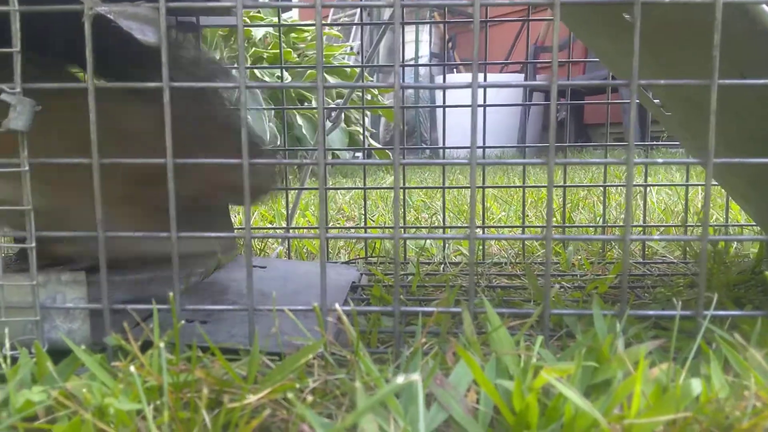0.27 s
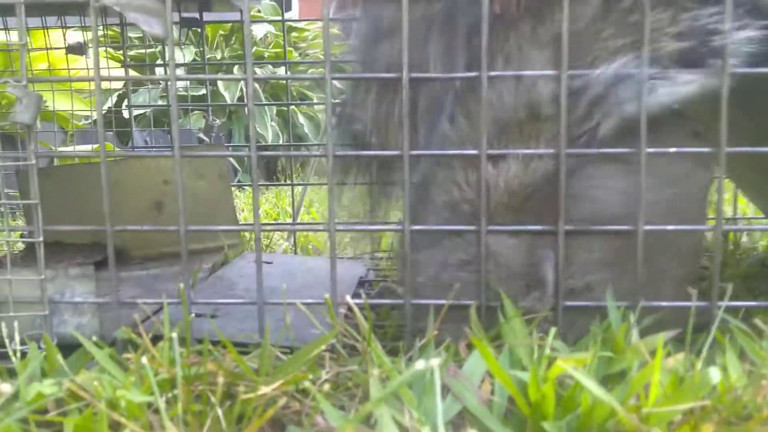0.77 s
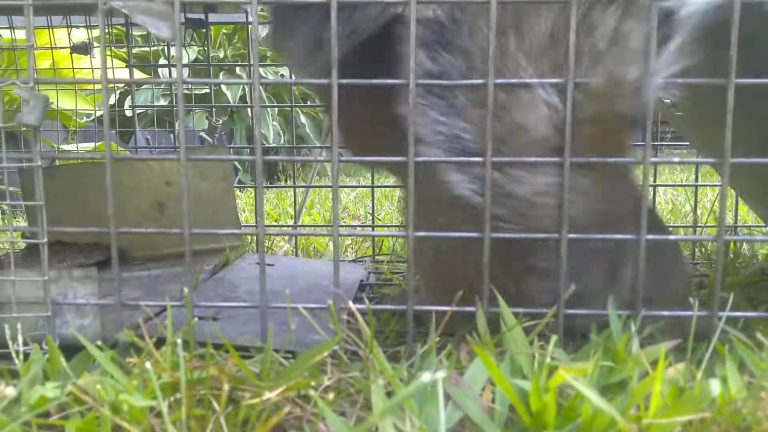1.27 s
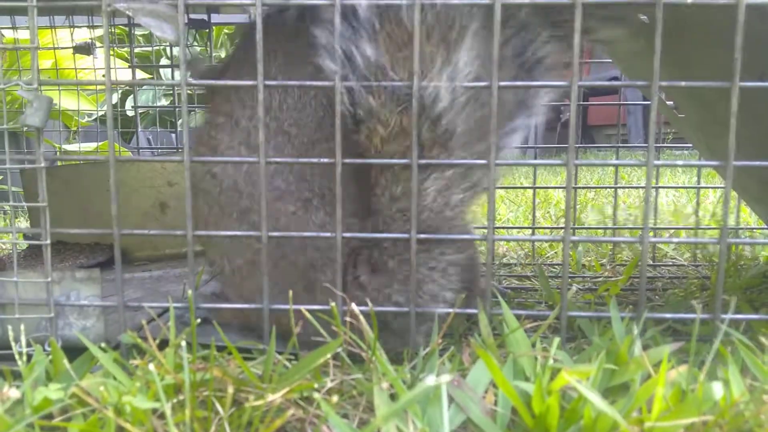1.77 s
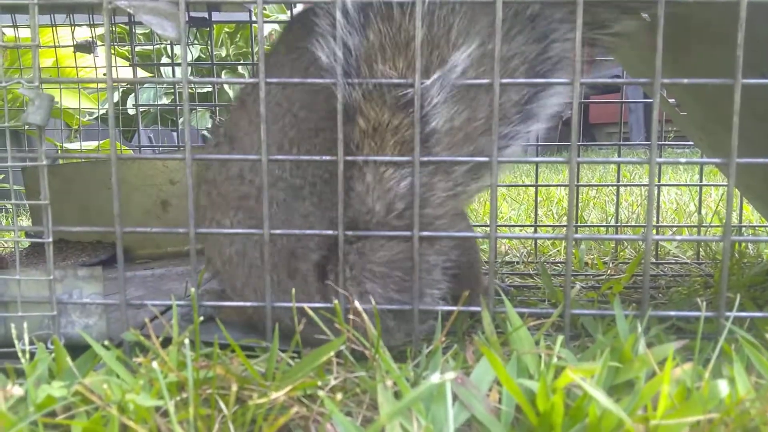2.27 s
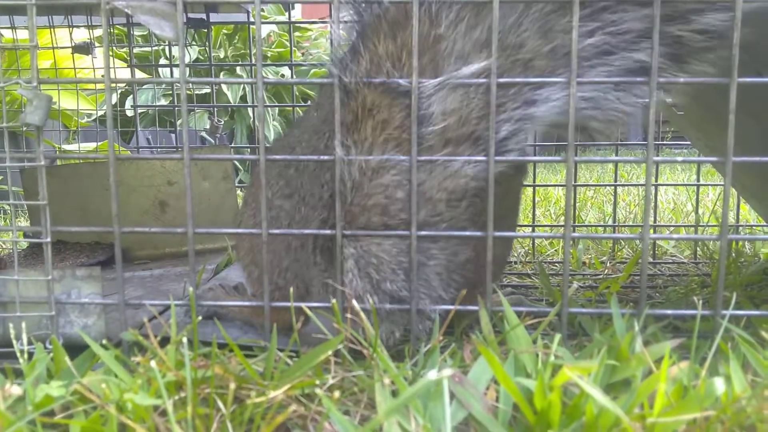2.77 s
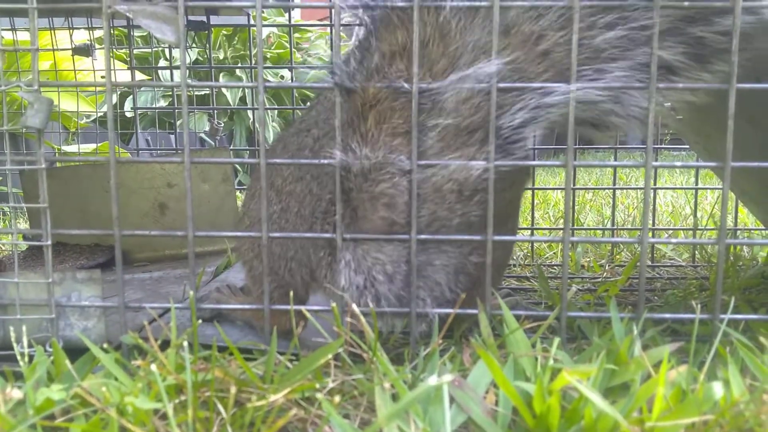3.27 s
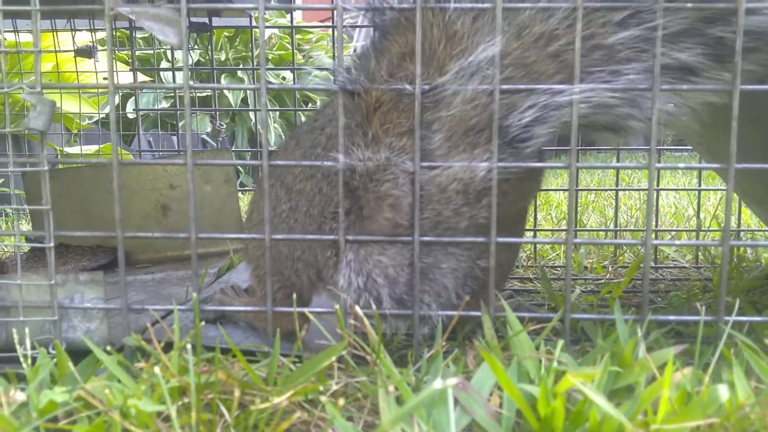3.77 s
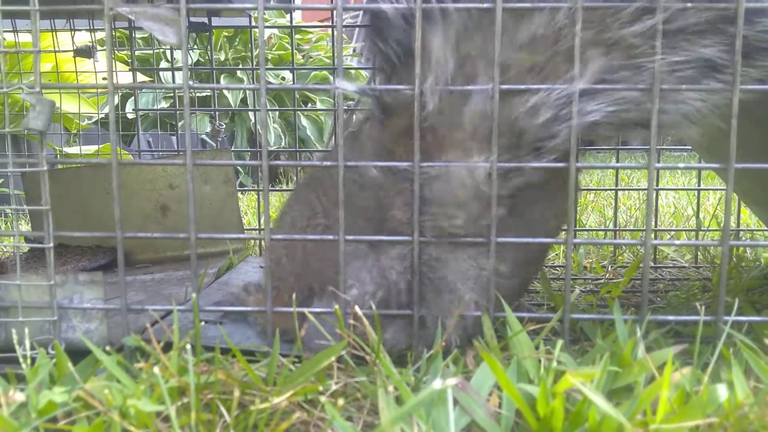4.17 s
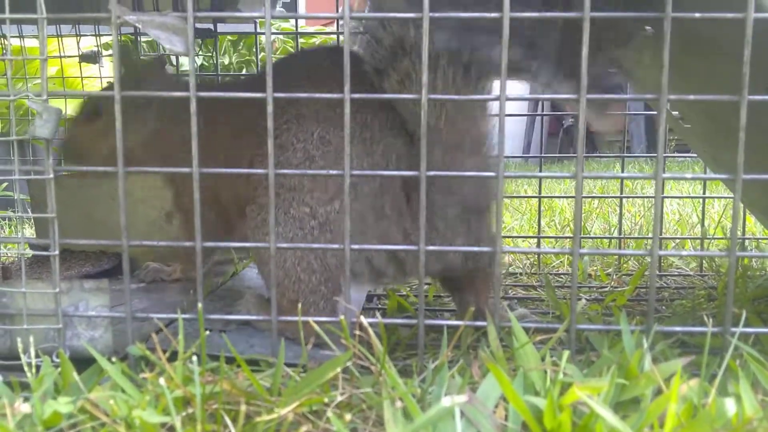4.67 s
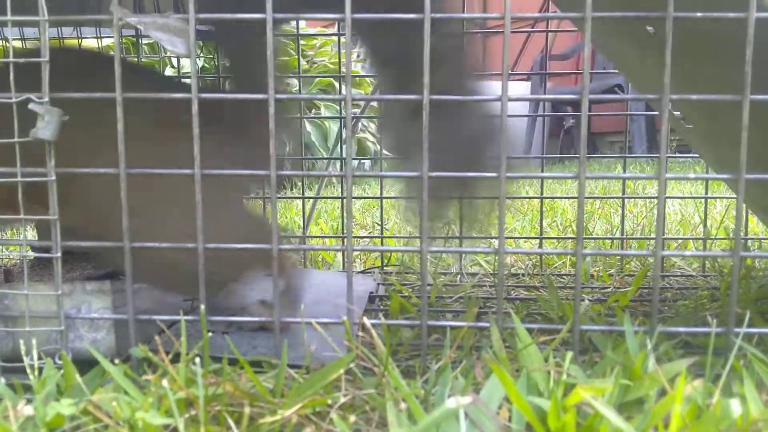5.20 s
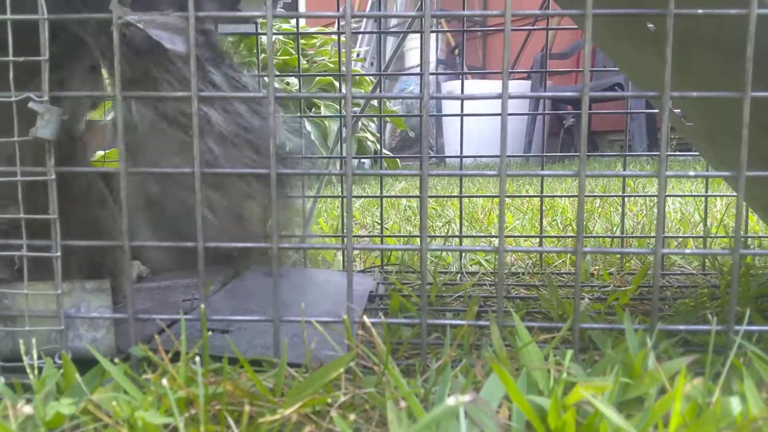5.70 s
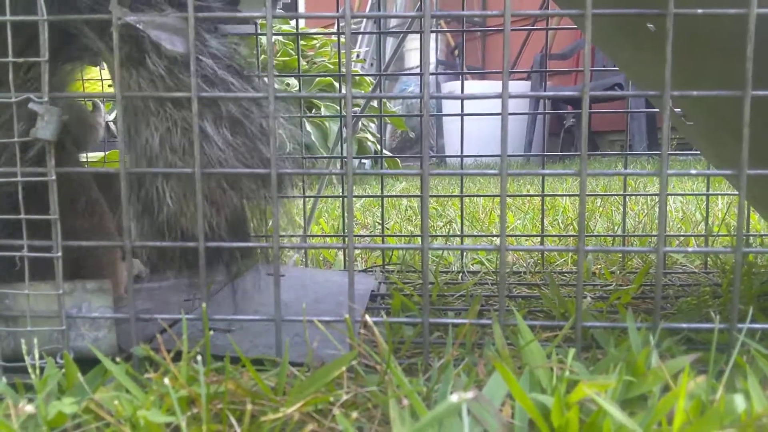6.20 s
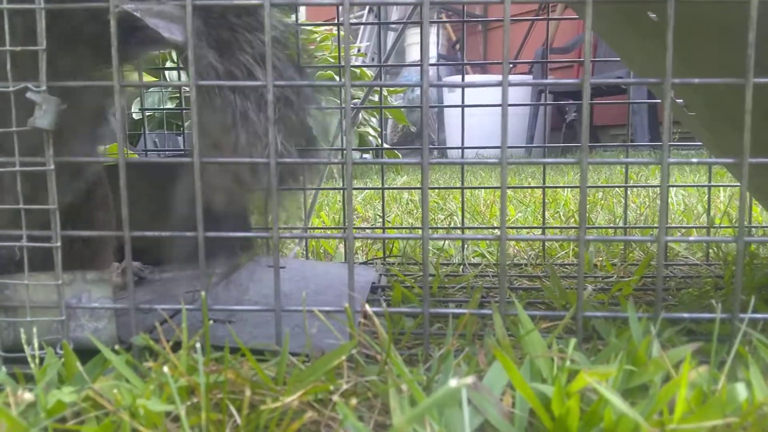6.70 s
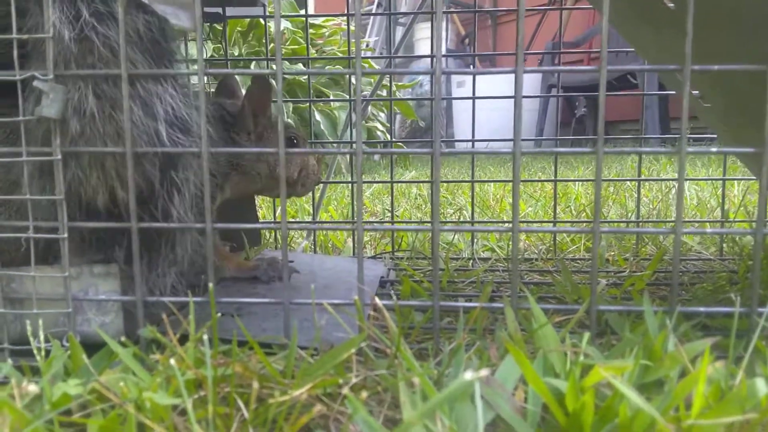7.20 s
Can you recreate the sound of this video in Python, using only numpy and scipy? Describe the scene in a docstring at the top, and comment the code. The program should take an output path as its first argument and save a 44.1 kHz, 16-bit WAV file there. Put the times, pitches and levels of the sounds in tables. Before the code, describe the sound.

A squirrel-sized rodent in a wire cage gives fifteen hoarse, raspy squeals that climb to shrill, amid scuffs and claw knocks on a lawn.

```python
"""Squealing rodent in a wire trap

A squirrel-sized rodent on a lawn gives fifteen hoarse calls: harmonic notes, rasping breath and hiss.
Throat and teeth resonances shape the calls, and sparse echoes give them a short tail.
Bursts of noise and single knocks ring mesh and tread plate as scuffs, drumming and claws.
A far rumble and a soft rustle of shaped noise lie below; two ports hear phase and level differences."""
import sys
import numpy as np
from scipy import signal
from scipy.fft import rfft, irfft
from scipy.io import wavfile
from scipy.ndimage import uniform_filter1d

SR = 44100
rng = np.random.default_rng(int(sys.argv[2]) if len(sys.argv) > 2 else 0)


def file_out(sig):
    """Save sig as 16-bit WAV at sys.argv[1]."""
    # one column per channel
    cols = np.atleast_2d(sig).T
    # limit, then scale
    lim = np.clip(cols, -1, 1)
    pcm = np.round(lim * 32767).astype(np.int16)
    wavfile.write(sys.argv[1], SR, pcm)


N = 328545

# calls, levels sliding evenly from start to end: (start [s], length [s], rasp start level [dB],
# rasp end level [dB], hiss start level [dB], hiss end level [dB])
CALLS = [(1.114, 0.19, -26.5, -41.5, -52.5, -62), (1.38, 0.27, -22.5, -37, -45.5, -53.5),
         (1.763, 0.1, -22, -18.5, -41.5, -28.5), (1.938, 0.13, -18.5, -27, -42, -46),
         (2.25, 0.12, -25.5, -35, -61, -42), (2.586, 0.14, -19.5, -33, -47, -51.5),
         (2.915, 0.15, -45.5, -38, -27.5, -60), (3.227, 0.14, -17, -45.5, -35, -52),
         (3.638, 0.16, -41, -37, -43, -38), (3.954, 0.28, -27.5, -51.5, -42, -67),
         (4.391, 0.29, -35.5, -41.5, -38, -65), (4.854, 0.35, -41, -49.5, -42, -63.5),
         (5.335, 0.37, -57, -37, -53, -50.5), (5.813, 0.2974, -46, -38.5, -50, -51),
         (6.205, 0.24, -38.5, -26.5, -58, -60.5)]
# bell-shaped chest pushes: (centre [s], half width at 1/e of the lift [s], rasp lift [dB], hiss lift [dB])
PUSHES = [(1.144, 0.038, 10, 10.5), (1.568, 0.053, 14.5, 9), (1.815, 0.07, 2, -1.5),
          (2.263, 0.022, 13.5, 18.5), (2.671, 0.06, 6.5, 7), (2.92, 0.021, 19.5, -13),
          (3.765, 0.039, 14, -5.5), (4.181, 0.075, 22, 16), (4.45, 0.064, 14.5, -0.5),
          (4.641, 0.065, 13.5, 9), (4.899, 0.058, 17.5, -2.5), (5.123, 0.028, 24.5, 8.5),
          (5.448, 0.088, 10, 9.5), (5.601, 0.23, 19, -2), (5.85, 0.026, 17, 5), (6.049, 0.1, 21, 3.5),
          (6.268, 0.028, 13, 16), (6.345, 0.046, 10, 8.5)]
# voiced notes, pitch before waver: (start [s], length [s], start pitch [Hz], middle pitch [Hz],
# end pitch [Hz], start level [dB], change of level [dB])
NOTES = [(1.118, 0.14, 676.6, 703, 737, -16.5, -5.5), (1.512, 0.1, 470.4, 795, 921, -28.5, 10.5),
         (1.764, 0.071, 447, 537, 459.2, -28.5, 8), (1.949, 0.094, 388.3, 602.5, 354.7, -20, -3),
         (2.281, 0.073, 720, 745, 420, -16.5, -17.5), (2.622, 0.054, 870.5, 610, 399, -22, -4.5),
         (2.689, 0.017, 2634, 2859, 3400, -17.5, -14.5), (2.916, 0.049, 1471, 1325, 1275, -31, 7.5),
         (2.949, 0.034, 1577, 1675, 1392, -25.5, 3.5), (2.987, 0.025, 1483, 1372, 1461, -22, -21.5),
         (3.232, 0.037, 831, 759, 685, -20, -11.5), (3.269, 0.068, 1417, 1612, 1438, -19, -15),
         (3.652, 0.023, 1635, 1398, 1359, -27.5, -1.5), (3.674, 0.09, 1682, 1549, 1333, -21, -0.5),
         (3.956, 0.018, 1291, 1203, 1143, -28.5, -4), (3.975, 0.046, 1160, 1495, 1739, -34.5, -5),
         (4.087, 0.096, 2997, 2882, 2784, -24.5, 4), (4.167, 0.041, 2810, 2313, 1316, -17.5, -4),
         (4.406, 0.077, 3912, 2587, 1700, -16.5, -4), (4.478, 0.046, 2980, 2777, 2735, -17.5, -6),
         (4.563, 0.04, 3365, 3307, 2700, -26, 8.5), (4.606, 0.049, 2670, 2500, 1396, -19.5, -4.5),
         (4.851, 0.03, 4630, 4340, 4820, -14.5, 7.5), (4.877, 0.011, 2508, 2750, 3160, -19, 0),
         (4.889, 0.068, 3240, 3020, 2643, -16.5, -5.5), (4.95, 0.055, 4723, 4555, 3790, -7, -5.5),
         (5.016, 0.085, 4370, 3970, 3630, -15.5, 3), (5.096, .042, 3190, 2890, 2700, -11.5, -11.5),
         (5.358, 0.029, 5850, 5846, 5750, -5.5, 4.5), (5.384, 0.058, 5300, 4400, 3385, -12, -10),
         (5.441, 0.042, 3280, 3062, 2991, -21.5, 9.5), (5.486, 0.033, 2608, 2580, 2546, -18, 0.5),
         (5.522, 0.03, 4680, 4480, 4140, -13, -12), (5.548, 0.07, 2955, 2911, 2613, -24.5, 7.5),
         (5.617, 0.094, 2632, 2553, 1778, -19.5, -7), (5.808, 0.029, 1291, 1123, 999, -28, 0),
         (5.851, .083, 1638, 2070, 2127, -22.5, -1.5), (5.939, 0.031, 2130, 2260, 2355, -22.5, 4),
         (5.961, 0.082, 2878, 2658, 2554, -23.5, 8), (6.21, 0.04, 1323, 815, 707, -22, -11.5),
         (6.247, 0.077, 1546, 1753, 2168, -29.5, 8.5), (6.333, 0.066, 2660, 2525, 2613, -15.5, -9)]
# throat resonances: (centre [Hz], width of one pass [Hz], gain [dB])
THROAT = [(725, 2000, -20.5), (2680, 626, 2), (3214, 144, -7), (4400, 780, -25.5), (5750, 910, -33)]
# main throat bands of the first calls: (centre [Hz], width of one pass [Hz], gain [dB])
TIGHT_THROAT = [(2540, 460, 4), (2950, 310, -16)]
# resonances at the teeth: (centre [Hz], width of one pass [Hz], gain [dB])
TEETH = [(4204, 1000, -7), (5980, 750, -9), (7435, 1000, 3), (9748, 1330, 5.5), (13000, 430, -11.5)]
# mouth opening, lifting the breath in the two lowest teeth bands: (time [s], lift [dB])
GAPE = [(3.8, 4), (4.3, 18), (5.9, 16), (6.2, 8)]
# feet and tail, levels driving the resonances: (time [s], mesh scratch [dB], plate and ground thud [dB],
# 60 dB decay [s])
SCUFFS = [(0.1972, -54.5, -50.5, 0.42), (0.2943, -35.5, -46.5, 0.12), (0.3502, -41.5, -43, 0.21),
          (0.385, -32.5, -64, 0.042), (0.428, -47, -49, 0.092), (0.448, -30.5, -34, 0.19),
          (0.557, -40, -63, 0.18), (0.587, -42, -40.5, 0.25), (0.7006, -35.5, -35.5, 0.24),
          (0.752, -34.5, -44, 0.13), (0.9739, -49.5, -34.5, 0.11), (1.285, -31, -38, 0.19),
          (1.6917, -37, -41.5, 0.13), (2.413, -52, -51.5, 0.17), (4.2849, -44, -49, 0.1),
          (4.374, -46, -35.5, 0.076), (5.285, -33, -40.5, 0.083), (5.3081, -36, -37.5, 0.15),
          (6.432, -45, -51.5, 0.13), (6.862, -42.5, -62, 0.076), (6.984, -41, -48, 0.2),
          (7.072, -34, -37.5, 0.18)]
# quick drumming on the plate: (time [s], drive level [dB])
DRUMS = [(3.499, -49), (3.552, -44), (3.599, -40.5), (3.641, -36), (3.689, -36.5), (3.748, -37.5),
         (3.801, -37.5)]
# claws knocking the plate: (time [s], drive level [dB])
KNOCKS = [(.889, -29), (0.988, -25), (2.154, -35)]
# wire mesh resonances: (centre [Hz], width of one pass [Hz], gain [dB])
MESH = [(2890, 2700, -9.5), (3880, 480, 16), (7850, 2800, 7.5), (9840, 6300, 6.5), (13400, 4000, -4)]
# tread plate resonances: (centre [Hz], width of one pass [Hz], gain [dB])
PLATE = [(278, 170, -3), (524, 110, -2), (844, 260, -3), (1245, 430, -10), (2700, 1200, -13)]
# background: (time [s], far rumble level [dB], grass and fur rustle level before flicker [dB])
BED = [(0, -55, -59.5), (.75, -47, -53), (.9, -50.5, -63.5), (2, -56.5, -66), (3.3, -58, -69),
       (4.3, -55, -69), (5.3, -57, -65), (6.6, -54.5, -63.5), (7.45, -50, -63)]
# rumble colour: (frequency [Hz], relative level per Hz [dB])
RUMBLE = [(55, -4), (110, 2), (230, -0.5), (500, -11.5), (1100, -19.5), (2000, -43), (3000, -50)]
# rustle colour: (frequency [Hz], relative level per Hz [dB])
RUSTLE = [(300, -9.5), (3000, 3.5), (8000, -5), (13900, -10.5), (14500, -31)]
# call at the two ports, before smoothing: (frequency [Hz], left lead [rad], left minus right [dB])
CALL_PORTS = [(400, 0.03, -2), (1673, 0.7, 1.5), (2247, 3.92, 6), (2690, 5.56, -5), (3526, 4.67, 6),
              (3780, 4.9, -13.5), (4290, 2.6, 10), (5130, 9.1, -6.5), (5845, 4.14, 1.5), (6400, 3.55, 1),
              (8700, 5.46, 1.5), (11900, 4.5, -2)]
# cage and lawn at the ports: (frequency [Hz], left lead [rad], left minus right [dB], likeness [0-1])
LAWN_PORTS = [(60, 0, 2.5, .4), (300, 0, 2.5, .65), (700, 0, 1.5, .97), (1500, 0, -1, .95),
              (1950, 2.9, 0, .98), (2250, 3.4, 1, .98), (3200, 6.3, 1, .8), (6450, 15.7, 3, .85),
              (14000, 37, 6, .4)]

OPENS_S, OPENING_S = 1.25, 0.41  # when the throat starts to open, and how long it takes
ATTACK_S, RELEASE_S = 0.0019, 0.043  # breath of each call
NOTE_SWELL_DB = 5.5  # mid-note lift
STEEP = 3  # order of the main throat bands and the teeth
WHISTLE_HZ = 2450  # notes starting here or higher keep a faint octave
BODY_DB, VOICE_BODY_DB = -8, 0  # rasp and voice into the lowest throat band
BODY_PER_GAPE = -.3  # dB in that band per dB of gape: it fades as the mouth widens
EDGE_HZ = 14250  # upper band limit
HZ = np.fft.rfftfreq(N, 1 / SR)


def folds():
    """Vocal folds give harmonics on a wavering pitch; slack, low folds beat unevenly and leak air."""
    hz, level, octave = np.zeros((3, N))
    for start, length, start_hz, mid_hz, end_hz, db, change_db in NOTES:
        span, u = progress(start, length)
        arch = 4 * u * (1 - u)
        bend_hz = mid_hz - (start_hz + end_hz) / 2
        hz[span] = start_hz + (end_hz - start_hz) * u + bend_hz * arch
        if start_hz < WHISTLE_HZ:
            # the octave grows as the folds tighten, then gives way
            octave[span] = (hz[span] / 850) ** 1.61 / (1 + (hz[span] / 2600) ** 16)
        else:
            octave[span] = .35
        level[span] = amp(db + change_db * u + NOTE_SWELL_DB * arch)
    level = np.minimum(level, uniform_filter1d(level, size=200))  # softens the note edges
    slack = 1 / (1 + (hz / 1100) ** 4)
    waver_hz = 6 + .014 * hz + .025 * np.maximum(hz - 3300, 0) + .011 * hz * slack
    turns = np.cumsum(hz + waver_hz * wander(150, N)) / SR
    shimmer = amp(2.2 * wander(90, N))
    overtones = sum(np.cos(2 * np.pi * k * turns) / (1 + (k * hz / 3400) ** 4) for k in range(3, 9))
    leak = 1.8 * rng.standard_normal(N) * slack
    stack = np.cos(2 * np.pi * turns) + octave * np.cos(4 * np.pi * turns) + 0.72 * overtones
    growl = 1 + .6 * np.cos(np.pi * turns) / (1 + (hz / 640) ** 8)  # slack folds beat strong-weak
    # the sharp closing of the folds, kept inside the band
    edge = sum(np.cos(2 * np.pi * k * turns) * (k * hz < EDGE_HZ) for k in range(2, 6))
    voice = level * shimmer * (stack * growl + leak)
    return voice, amp(-46.0) * level * shimmer * edge


def breath(edge):
    """Air through the tight throat rasps in uneven puffs and hisses at teeth that ring with the edge."""
    t, gate, db = np.arange(N) / SR, np.zeros(N), np.zeros((2, N))
    for start, length, rasp_db, rasp_end_db, hiss_db, hiss_end_db in CALLS:
        span, u = progress(start, length)
        gate[span] = np.minimum(1, u * length / ATTACK_S) * np.minimum(1, (1 - u) * length / RELEASE_S)
        db[:, span] = np.outer([rasp_db, hiss_db], 1 - u) + np.outer([rasp_end_db, hiss_end_db], u)
    for s, width, *lift_db in PUSHES:
        span, u = progress(s - 3 * width, 6 * width)
        db[:, span] += np.outer(lift_db, np.exp(-(6 * u - 3) ** 2))
    puffs = amp(2.5 * wander(220, 3, N))
    air = evened(rng.standard_normal((3, N)) * puffs)
    rasp, low, high = gate * amp(db[[0, 1, 1]]) * air
    low, high = [low, high] * amp(1.8 * wander(400, 2, N))  # the hiss comes and goes
    gape_db, = columns(GAPE, t)
    low_hiss = ring(low * amp(gape_db) + edge, TEETH[:2], order=STEEP)
    high_hiss = ring(high + edge, TEETH[2:], order=STEEP)
    return amp(12.5) * rasp, amp(8.5) * (low_hiss + high_hiss)


def throat(rasp, voice):
    """Rasp and voice ring a throat whose main band starts low and narrow, then opens in the first calls."""
    t, both = np.arange(N) / SR, rasp + voice
    opened = np.clip((t - OPENS_S) / OPENING_S, 0, 1)
    gape_db, = columns(GAPE, t)
    body = (rasp * amp(BODY_DB) + voice * amp(VOICE_BODY_DB)) * amp(BODY_PER_GAPE * gape_db)
    wide = ring(both * opened, THROAT[1:], order=STEEP)
    tight = ring(both * (1 - opened), TIGHT_THROAT + THROAT[3:], order=STEEP)
    return wide + tight + ring(body, THROAT[:1])


def garden(x):
    """Sparse echoes from the plate, pots and fence give each call a short tail."""
    count, slot = 300, 22  # one echo at a random sample of each 22-sample slot
    taps = np.zeros(count * slot)
    at = np.arange(count) * slot + rng.integers(0, slot, count)
    taps[at] = rng.choice([-1., 1.], count) * amp(-60 * at / SR / 0.048)  # 60 dB down in 48 ms
    return signal.oaconvolve(x, taps / np.linalg.norm(taps))[:N]


def scuffs():
    """Dying bursts of grit scratch the mesh and thud the plate; single impulses knock and drum on it."""
    t, drive = np.arange(SR // 3) / SR, np.zeros((2, N + SR))
    taps, knocks = np.zeros((2, N))
    for s, scratch_db, thud_db, t60 in SCUFFS:
        at = round(s * SR)
        shape = np.minimum(1, t / 0.00006) * amp(-60 * t / max(t60, .01))
        knocks[at] = amp(thud_db + 3.0)  # the first contact
        drive[:, at:][:, :len(t)] += amp([[scratch_db], [thud_db]]) * shape
    for s, db in DRUMS:
        at = round(s * SR)
        taps[at] = amp(db)
        drive[0, at:][:len(t)] += amp(db - 3.0 - 60 * t / 0.038)  # the mesh rattles along
    for s, db in KNOCKS:
        knocks[round(s * SR)] = amp(db)
    grit = evened(rng.standard_normal((2, N)) * amp(1.0 * wander(60, 2, N)))
    scratch = [ring(drive[0, :N] * g, MESH) * amp(-5.5) for g in grit]
    thud = [ring(drive[1, :N] * g, PLATE) * amp(21.0) for g in rng.standard_normal((2, N))]
    drumming = amp(47.0) * (ring(taps, PLATE[:1]) + 0.24 * ring(taps, PLATE[1:]))
    return np.add(scratch, thud) + drumming + amp(30.5) * ring(knocks, PLATE)


def bed():
    """Shaped noise makes a far rumble and a soft, flickering rustle of grass and fur."""
    rumble_db, rustle_db = columns(BED, np.arange(N) / SR)
    flicker_db = 3 * evened(uniform_filter1d(wander(700, N), size=300))
    return amp(rumble_db) * coloured(RUMBLE) + amp(rustle_db + flicker_db) * coloured(RUSTLE)


def amp(db):
    """Turns decibels into an amplitude factor."""
    return 10 ** (np.asarray(db) / 20)


def evened(x):
    """Scales x to an RMS of one."""
    return x / np.sqrt(np.mean(x ** 2) + 1e-20)


def wander(size, *shape):
    """Slow random movement: noise averaged over size samples, at an RMS of one."""
    return evened(uniform_filter1d(rng.standard_normal(shape), size=size))


def progress(start, length):
    """The samples of an event and how far it has run, 0 to 1."""
    span = slice(round(start * SR), round((start + length) * SR))
    return span, np.linspace(0, 1, span.stop - span.start)


def columns(table, at):
    """Reads every column of a table along its first."""
    first, *rest = np.transpose(table)
    return [np.interp(at, first, c) for c in rest]


def ring(x, modes, order=2):
    """Passes x through parallel resonances, each applied order times for steep flanks."""
    gain = sum(amp(db) / (1 + 2j * (HZ - hz) / width) ** order for hz, width, db in modes)
    return irfft(rfft(x) * gain, N)


def coloured(points):
    """Two unrelated noises with a spectrum given on a log-frequency axis."""
    hz, db = np.transpose(points)
    gain = amp(np.interp(np.log(HZ + 1), np.log(hz + 1), db))
    return evened(irfft(rfft(rng.standard_normal((2, N))) * gain, N))


def ports(left, right, lead, balance_db):
    """Turns the right port's phase back by the lead at each frequency and splits the level."""
    tilt = amp(balance_db / 2)
    return np.array([irfft(left * tilt, N), irfft(right * np.exp(-1j * lead) / tilt, N)])


def scene():
    """Places the call and the cage and lawn sounds at the two ports."""
    voice, edge = folds()
    rasp, hiss = breath(edge)
    call = throat(rasp, voice) + hiss
    call = rfft(call + amp(-17.0) * garden(call))
    call_lead, call_balance_db = uniform_filter1d(columns(CALL_PORTS, HZ), size=1500)
    lead, balance_db, like = columns(LAWN_PORTS, HZ)
    like = np.clip(like, 0, 1)
    near, other = rfft(scuffs() + bed())
    right = like * near + np.sqrt(1 - like ** 2) * other  # partly the same sound as the left
    lawn = ports(near, right, lead, balance_db)
    return ports(call, call, call_lead, call_balance_db) + lawn


def record(dry):
    """A high-pass cuts the deepest bass and a low-pass limits the treble."""
    thin = signal.sosfilt(signal.butter(4, 48., "high", fs=SR, output="sos"), dry)
    return signal.oaconvolve(thin, signal.firwin(511, EDGE_HZ, window=("kaiser", 9), fs=SR)[None], "same")


dry = scene()
out = record(dry)
file_out(out)
```